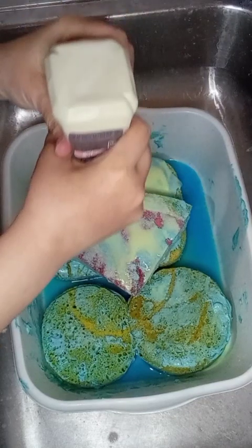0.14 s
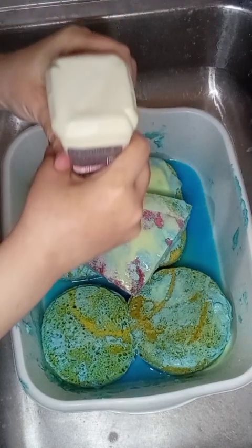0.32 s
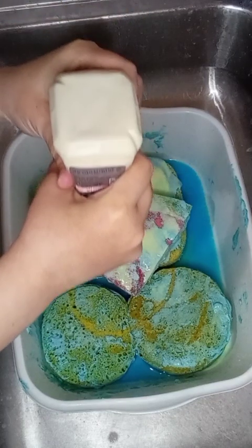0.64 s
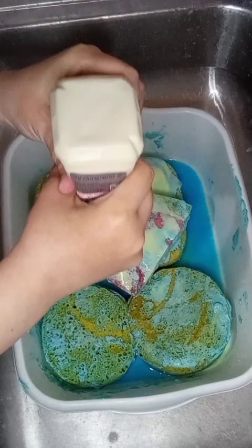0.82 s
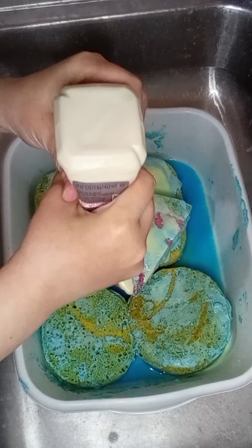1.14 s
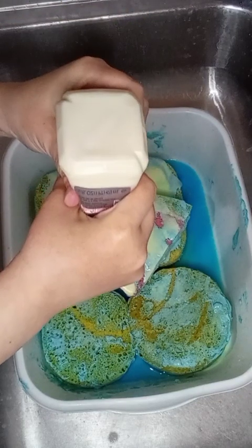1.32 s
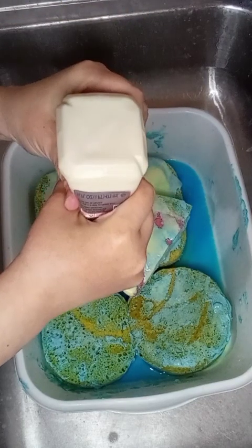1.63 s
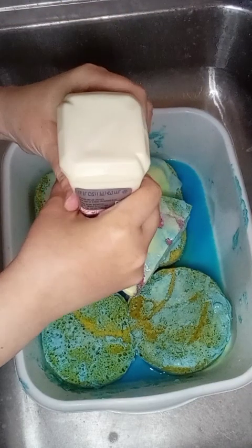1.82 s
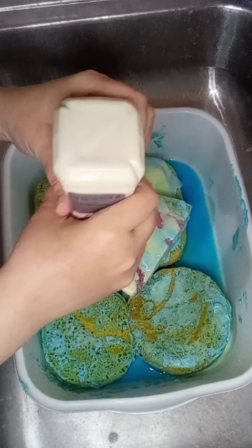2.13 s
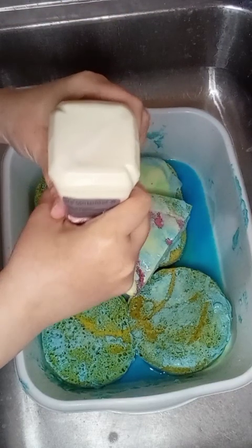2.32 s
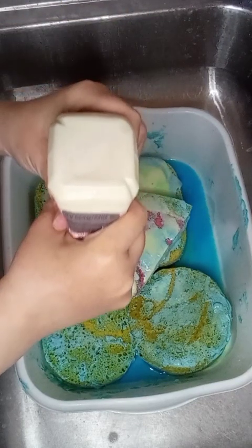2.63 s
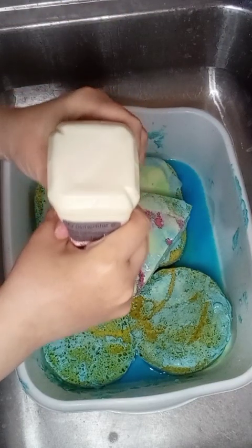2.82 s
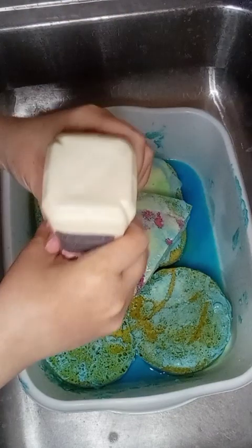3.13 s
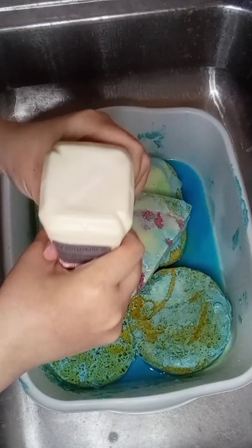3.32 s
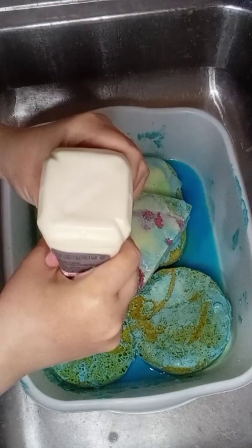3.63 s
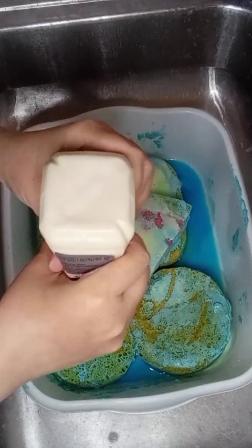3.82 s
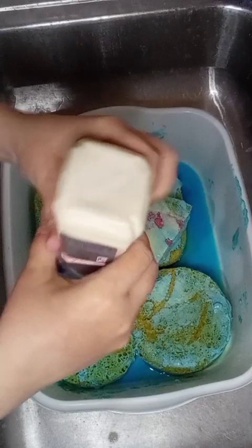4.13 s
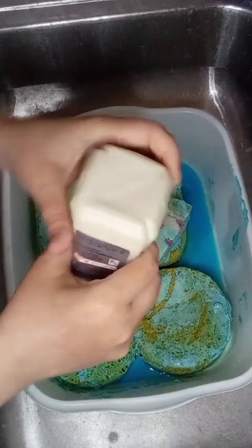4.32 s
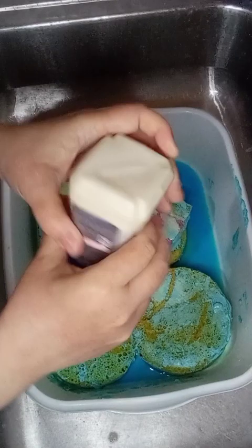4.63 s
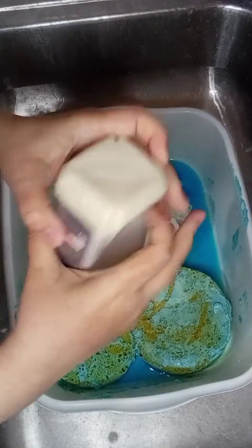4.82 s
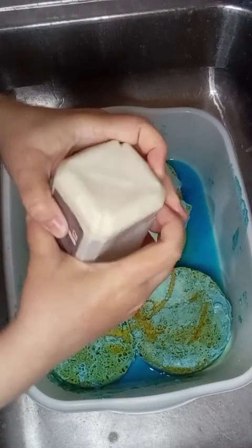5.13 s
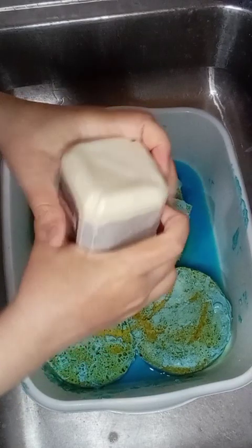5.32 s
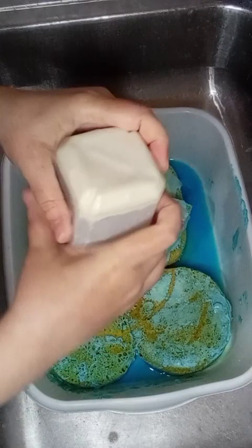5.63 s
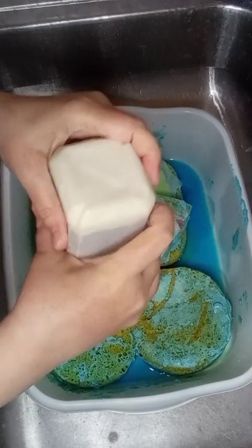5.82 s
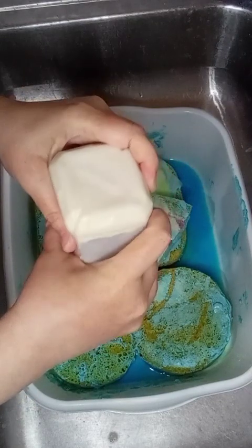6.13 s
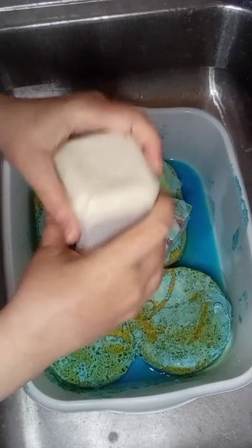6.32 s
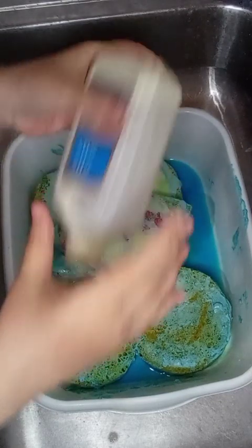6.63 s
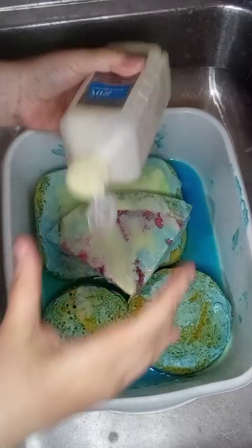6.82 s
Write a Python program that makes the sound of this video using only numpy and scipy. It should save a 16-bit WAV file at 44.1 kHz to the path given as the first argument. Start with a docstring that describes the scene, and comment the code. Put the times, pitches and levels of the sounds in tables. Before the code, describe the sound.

A close stereo take over a tub in a steel sink, with quiet stirring kitchen air, a wavering low drone, faint hum and a barely audible thin whine throughout. From the start an upended plastic bottle gives a steady, bright, breathy hiss that swells to about 1 s, then breaks into wet spurts from 1.2 s and cuts off near 1.9 s. Air gurgles back in with a low bubbling gulp. Around 2.4-2.7 s comes a shorter, rasping squirt, followed by soft gulps and a fuller gurgle at 3.0 s. Another brief squirt arrives at 3.4 s, with small bubbles after. Then it is mostly quiet, with a soft wall thump at 4.3 s and tiny ticks. From 5.1 to 5.6 s hollow plastic pops and cracks stand out, loudest near 5.5 s. A quick spluttering squirt at 5.9-6.1 s ends in little gurgles, then faint low pops at 6.6 s and room tone to about 7 s.

```python
"""Close stereo take, a bottle held upside down over soapy sponges in a tub in a steel sink.
A long squeeze hisses with air and spurting soap for 1.9 s; short squeezes follow near 2.4, 3.4 and 5.9 s.
Air gurgles back in between; dented plastic walls pop as the hands shift their grip, mostly from 5.1 to 5.6 s.
Hiss is shaped noise coloured by the sink, gurgles are knocks on a cavity, pops are snaps that ring the bottle.
Behind it all, the kitchen is stirring air, a low drone, a hum and a thin whine."""
import sys
import numpy as np
from scipy import signal
from scipy.fft import rfft, irfft
from scipy.io import wavfile
from scipy.ndimage import uniform_filter1d, map_coordinates

SR = 44100
rng = np.random.default_rng(int(sys.argv[2]) if len(sys.argv) > 2 else 0)


def master(y):
    """Save y as 16-bit WAV."""
    cut = np.clip(np.atleast_2d(y).T, -1, 1)
    pcm = np.round(cut * 32767)  # scale
    wavfile.write(sys.argv[1], SR, pcm.astype(np.int16))


N = 307812
TIME = np.arange(N) / SR
FREQS = np.fft.rfftfreq(N, 1 / SR)

# left-right likeness of flow and room air: (frequency [Hz], likeness [0-1])
LIKENESS = [(100, 0.81), (600, 0.39), (1400, 0.09), (3000, 0.05), (16000, 0.05)]


def amp(db):
    """Decibels to gain."""
    return 10 ** (np.asarray(db) / 20)


def unit(x):
    """Scales to rms 1."""
    return x / np.sqrt(np.mean(x ** 2) + 1e-20)


def read(points, hz):
    """Reads a spectrum on a log-frequency axis."""
    f, value = np.transpose(points)
    return np.interp(np.log(hz + 1), np.log(f), value)


def colour(x, gain):
    """Filters by a gain for each frequency."""
    return irfft(rfft(x) * gain, N)


def hump(f, centre, half_width, order=2):
    """Gain of a resonance, half at the half-width; a higher order has steeper sides."""
    return 1 / (1 + abs((f - centre) / half_width) ** order)


def wander(hz):
    """Smooth chance of rms 1, mostly slower than the given rate."""
    return unit(colour(rng.standard_normal(N), hump(FREQS, 0, hz)))


def pair(likeness, size=N):
    """Noise at two microphones, sharing a common part and an opposed part."""
    common, opposed = rfft(rng.standard_normal((2, size)))
    c = np.clip(likeness, 0, 1)
    middle = np.sqrt((1 + c) / 2) * common
    side = np.sqrt((1 - c) / 2) * opposed
    return irfft(middle + np.array([[1], [-1]]) * side, size)


def add(mix, s, sound):
    """Mixes a sound in at time s."""
    part = mix[..., round(s * SR):][..., :sound.shape[-1]]
    part += sound[..., :part.shape[-1]]


def nozzle(fine, coarse, wet, jet_db=4, spray_db=2.5, sputter_db=1.8, fizz_db=1.13, clots_db=1.24):
    """The jet hisses fairly evenly; spray and splutter share one sputtering flow, with soap in clots."""
    # colour of the spray: (frequency [Hz], density [dB per Hz])
    spray_colour = [(400, -37.5), (1200, -4), (1600, 0), (2000, 2.5), (2600, 1), (3500, 1.5), (4600, -4.5),
                    (7000, -11), (9000, -27.5), (11000, -27), (13800, -30.5), (14800, -14.5), (16000, -4.5)]
    # colour of the wet splutter: (frequency [Hz], density [dB per Hz])
    splutter_colour = [(100, -29), (230, -18), (400, -13), (700, 0.5), (950, 5.5), (1450, 2.5),
                       (2000, -7.5), (4000, -18.5), (16000, -47)]
    air = amp(jet_db + fizz_db * wander(370)) * fine * jet()
    spray = amp(spray_db) * coarse * spatter(spray_colour, burst_db=2.5, burst_hz=301.8)
    clots = amp(clots_db * wander(45))
    splutter = clots * wet * spatter(splutter_colour, burst_db=1.0, burst_hz=119)
    return air + (spray + splutter) * amp(sputter_db * wander(60))


def jet(flutter=0.017, patchy_db=1.78):
    """Turbulence in the nozzle: noise with a broad fluttering peak that moves in pitch, width and height."""
    # the peak climbs and sharpens to 1.15 s, then drops again, and is broader in the short squeezes:
    # (time [s], pitch [Hz], half-width [Hz], height of the peak [dB])
    peak_path = [(0, 5300, 2250, 7.5), (.45, 5400, 1930, 9.5), (.8, 6000, 1510, 9), (1.15, 7300, 1300, 4.5),
                 (1.8, 6420, 1058, 11), (2.5, 5840, 1800, 7), (3.5, 5160, 1604, 7), (6.1, 5855, 1720, 7)]
    # colour under the peak: (frequency [Hz], density [dB per Hz])
    jet_colour = [(300, -55.5), (1200, -34), (2200, -15.5), (3000, -7.5), (3800, -7.5), (4500, -3.5),
                  (7200, -2), (7900, -8), (9800, -3), (11500, -9.5), (13800, -13.5), (14800, -4),
                  (15800, -5.5)]
    f, t, z = signal.stft(rng.standard_normal(N), SR, nperseg=512)
    when, *controls = np.transpose(peak_path)
    pitch, width, height = (np.interp(t, when, control) for control in controls)
    pitch = pitch * np.exp(flutter * np.interp(t, TIME, wander(27)))
    # turbulence is uneven over neighbouring frequencies and moments
    patches = uniform_filter1d(rng.standard_normal(z.shape), size=6, axis=0)
    patches = unit(uniform_filter1d(patches, size=8, axis=1))
    peak_db = height * hump(f[:, None], pitch, width)
    shape = amp(read(jet_colour, f)[:, None] + peak_db + patchy_db * patches)
    shape /= np.linalg.norm(shape, axis=0)
    return unit(signal.istft(z * shape, SR, nperseg=512)[1][:N])


def spatter(spectrum, burst_db, burst_hz):
    """Soap films tear in quick uneven bursts."""
    bursts = rng.standard_normal(N) * amp(burst_db * wander(burst_hz))
    return unit(colour(bursts, amp(read(spectrum, FREQS))))


def outflow():
    """Gains of jet, spray and splutter: the stream of air and the spurts add in power."""
    # the long first squeeze drives a steady stream of air: (time [s], effort [dB])
    stream = [(0.0, -40.5), (0.146, -37.5), (1.02, -30), (1.382, -33.5), (1.408, -37), (1.534, -34),
              (1.618, -46.5), (1.796, -43.5), (1.88, -86)]
    # the stream is mostly jet: (jet [dB], spray [dB], splutter [dB]), relative to the effort
    stream_mix = (2.4, -10.5, -24.5)
    # spurts of soap and air, and the breath of air sucked back at 1.89 s, ahead of the nozzle's own trims:
    # (start [s], rise [s], hold [s], fade [dB per s of spray], spray [dB],
    #  jet over spray [dB], splutter over spray [dB])
    spurts = [(1.198, 0.1, 0.025, 114, -31, -26, -16), (1.353, 0.015, 0.059, 260, -33.5, -20, -9),
              (1.519, 0.017, 0.047, 95, -34.5, -23, -7.5), (1.708, 0.015, 0.07, 326, -40, -19, -13),
              (1.89, 0.061, 0.0097, 157, -53.5, -4, -1.5), (2.425, 0.051, 0.057, 136, -35, 3.5, -13),
              (2.523, 0.065, 0.11, 176, -31.5, -5, -9), (2.799, 0.081, 0.026, 299, -54, -11, 3),
              (3.051, 0.036, 0.055, 279.5, -56.5, -4, -0.5), (3.379, 0.034, 0.1, 104.5, -39, -0.5, -4),
              (3.444, 0.047, 0.042, 117, -33.5, -6, -9), (3.683, 0.026, 0.053, 338, -48.5, -11, 2.5),
              (5.913, 0.04, 0.027, 109, -42, -6.5, -3.5), (5.968, 0.032, 0.013, 163, -32.5, -2, -9),
              (6.024, 0.024, 0.032, 204, -36.5, -7, -1.5), (6.148, .02, 0.032, 130, -62, -10, 4),
              (6.242, 0.031, 0.01, 333, -55.5, -14.5, 1.5)]
    effort = np.interp(TIME, *np.transpose(stream), right=-200)
    power = amp(np.add.outer(stream_mix, effort)) ** 2
    for row in spurts:
        start, gains = spurt(*row)
        add(power, start, gains ** 2)
    return np.sqrt(power)


def spurt(start, rise, hold, fade, db, jet_db, splutter_db, open_s=.008, breakout_db=-7):
    """A spurt breaks out under its peak, builds, holds and sinks; jet, spray and splutter follow its pressure."""
    # the jet needs force, the splutter lingers:
    # (jet [dB per dB of pressure], spray [dB per dB], splutter [dB per dB])
    pressure_law = (1.8, 1.0, 0.92)
    t = np.arange(SR) / SR
    pressure = breakout_db * np.clip(1 - t / rise, 0, 1) - fade * np.maximum(t - rise - hold, 0)
    mix = db + np.array([[jet_db], [0], [splutter_db]])
    opening = np.minimum(t / open_s, 1)
    return start, opening * amp(mix + np.outer(pressure_law, pressure))


def gurgle(wet, churn_db=-17, bubbles_per_s=110, unevenness=0.29, rise_s=.025, fade_db_per_s=304):
    """An uneven train of bubbles knocks on the air inside the bottle, in gulps and softly while soap flows."""
    # air bubbles back into the bottle: (start [s], length [s], level [dB])
    gulp_times = [(1.897, 0.13, -46), (2.54, 0.028, -50.5), (2.722, 0.076, -51.5), (2.906, 0.064, -52),
                  (3.024, 0.13, -42.5), (3.58, 0.058, -48), (3.764, 0.052, -52.5), (6.095, 0.078, -56),
                  (6.274, 0.038, -49)]
    # resonances of the bubbling bottle: (frequency [Hz], full width [Hz], level [dB])
    cavity = [(131.2, 36, -1.5), (188.4, 45, 6), (235.2, 20, 6), (322, 55, -9), (538, 37, -4)]
    turns = np.cumsum(bubbles_per_s * np.exp(unevenness * wander(80))) / SR
    # one knock of random strength at each whole turn
    knocks = np.diff(np.floor(turns), prepend=0) * rng.uniform(0.17, 1, N)
    body = sum(amp(db) * hump(FREQS, hz, width / 2) for hz, width, db in cavity)
    gulps = np.zeros(N)
    for s, length, db in gulp_times:
        rise = np.clip((TIME - s) / rise_s, 0, 1)
        gulps += rise * amp(db - fade_db_per_s * np.maximum(TIME - s - length, 0))
    return (gulps + amp(churn_db) * wet) * unit(colour(knocks, body))


def pops(snap_cycles=0.49, ring_db=-8.0, room_db=-12, grip_detune=0.026):
    """A wall flips in about one swing, its crease cracks, the grip-detuned bottle rings and the room answers."""
    # the walls buckle, levels before the walls radiate: (time [s], snap level [dB], snap pitch [Hz],
    #  ringing over snap [dB, before ring_db], crack over snap [dB])
    buckles = [(3.295, -36, 154, 2.5, -40), (4.271, -32, 182, 3.5, -39.5), (5.1263, -19.5, 234, -2.5, -42),
               (5.1970, -20.5, 235, 4, -38.5), (5.2572, -31, 500, -2, -30), (5.2628, -33, 473, 7, -31),
               (5.2690, -33.5, 570, 0.5, -30), (5.2755, -19.5, 238, -3, -34),
               (5.4853, -25, 540, -4.5, -37.5), (5.4888, -13.5, 271, -6.5, -40),
               (5.4925, -29, 448, -12, -43), (5.5160, -32, 584, 1.5, -44), (5.5194, -21.5, 166, -1, -44),
               (5.5928, -16, 720, 0, -14), (5.5991, -19, 525, -10, -40), (6.602, -37.5, 115, -1, -40),
               (6.6110, -37, 123, 2, -39.5)]
    # what the bottle rings with: (frequency before detuning [Hz], level [dB], t60 [s])
    bottle_modes = [(108.8, -1, 0.2), (195.5, -4.5, 0.084), (231.8, -10.5, 0.21), (357, -12.5, 0.1),
                    (521, -0.5, 0.09), (580, -4, 0.24), (634, -8.5, 0.24), (746, -11, 0.17),
                    (980, -11, 0.04), (1290, -16, .04), (2320, -9, .04), (2770, -1, .03)]
    # crack of a crease: (frequency [Hz], half-width [octaves], t60 [s])
    crease = (1980, 0.47, 0.025)
    # how well the flexing walls radiate: (frequency [Hz], gain [dB])
    radiation = [(20, -25.5), (50, -6), (100, 0.5), (220, 0), (310, -8.5), (440, 3), (900, 0.5),
                 (3000, -4.5), (6000, -19)]
    lead = .012  # s from the start of the snap's window to its centre
    t = np.arange(SR // 2) / SR
    octaves = np.log2(np.fft.rfftfreq(len(t), 1 / SR) + 1)
    crack_hz, crack_width, crack_t60 = crease
    out = np.zeros(N)
    for s, db, hz, ringing_db, crack_db in buckles:
        tension = 1 + grip_detune * rng.uniform(-0.94, 1)
        ring = sum(amp(level - 60 * t / t60) * np.cos(2 * np.pi * mode * tension * t)
                   for mode, level, t60 in bottle_modes)
        turns = (t - lead) * hz
        snap = -np.sin(2 * np.pi * turns) * np.exp(-(turns / snap_cycles) ** 2)
        rung = signal.fftconvolve(snap, ring)[:len(t)] / abs(snap).sum()
        add(out, s - lead, amp(db) * (snap + amp(ring_db + ringing_db) * rung))
        crack_band = hump(octaves, np.log2(crack_hz), crack_width, order=6)
        crack = irfft(rfft(rng.standard_normal(len(t))) * crack_band, len(t))
        add(out, s, crack / abs(crack).max() * amp(db + crack_db - 60 * t / crack_t60))
    out = colour(out, amp(read(radiation, FREQS)))
    return out + amp(room_db) * echoes(out, t60=0.22, delay=0.018)


def echoes(x, t60, delay):
    """Dense dying reflections of energy 1, different at each microphone."""
    t = np.arange(SR // 2) / SR
    tail = rng.standard_normal((2, len(t))) * amp(-60 * t / t60) * (t > delay)
    tail /= np.linalg.norm(tail, axis=1, keepdims=True)
    return signal.fftconvolve(np.atleast_2d(x), tail, axes=1)[:, :N]


def ticks(grain_db=-3.5):
    """Small smacks and crackles, each a quickly dying grainy fizz."""
    # wet smacks and blubs at the nozzle and crackles of the plastic, levels ahead of the sink:
    # (time [s], level [dB], frequency [Hz], half-width [octaves], t60 [s])
    smacks = [(1.875, -65, 2400, 1.3, 0.091), (1.952, -43.5, 4970, 0.57, 0.031),
              (2.845, -43.5, 620, 0.34, .35), (2.885, -45, 710, 0.71, 0.13), (3.022, -64, 10000, .25, .09),
              (3.073, -55, 9800, 0.12, 0.057), (3.19, -69, 10000, .3, 0.045),
              (3.857, -58.5, 6900, 1.8, 0.066), (3.925, -70, 10100, 0.18, 0.042),
              (4.273, -60, 2980, 0.68, 0.066), (4.531, -43, 5140, 0.24, 0.057),
              (5.121, -62.5, 8000, 1.9, 0.05), (5.195, -49.5, 1370, 1.87, 0.36),
              (5.203, -61.5, 4600, 0.32, 0.62), (5.255, -43, 900, 0.91, 0.14),
              (5.272, -47, 3650, 1.4, 0.083), (5.492, -59.5, 4740, 1, 0.2), (5.59, -44.5, 940, 0.86, 0.17),
              (5.825, -64, 4400, 0.11, 0.31), (5.922, -42.5, 5500, 1, 0.054),
              (5.941, -38.5, 620, 0.47, 0.17), (6.37, -71, 9980, .3, .06), (6.51, -66, 8850, 1.6, 0.041)]
    t = np.arange(SR // 4) / SR
    octaves = np.log2(np.fft.rfftfreq(len(t), 1 / SR) + 1)
    out = np.zeros(N)
    for s, db, hz, width, t60 in smacks:
        band = hump(octaves, np.log2(hz), width, order=4)
        fizz = irfft(rfft(rng.standard_normal(len(t))) * band, len(t))
        add(out, s, unit(fizz) * amp(db - 60 * t / t60))
    return out * unit(amp(grain_db * wander(200)))


def bounce(x):
    """The echo off the tub combs the hiss with ridges and hollows that slide as the bottle moves."""
    # early echo off the tub: (time [s], delay [ms], strength relative to the direct sound [0-1])
    tub_echo = [(0, .725, .22), (.4, .752, .32), (.8, .775, .22), (1.2, .74, .08), (1.8, .72, .08),
                (2.6, .76, .08), (3.5, .83, .12), (6.1, .83, .1)]
    when, *controls = np.transpose(tub_echo)
    delay_ms, strength = (np.interp(TIME, when, control) for control in controls)
    echo = map_coordinates(x, [(TIME - delay_ms / 1000) * SR], order=3)
    return (x + strength * echo) / np.hypot(1, strength)


def sink(x, steel_width_hz=34, gain_db=-1, standing=0.83, size=16384):
    """Standing waves and ringing steel colour the hiss differently at each microphone."""
    # standing waves between the steel walls, before the standing factor:
    # (frequency [Hz], full width [Hz], left [dB], right [dB])
    wall_waves = [(797, 80, -2.0, -3.9), (904, 80, 2.8, 5.2), (1087, 80, 4.9, -0.1), (1238, 80, -3.7, -4.5),
                  (1335, 80, -1.5, 2.6), (1400, 80, 2.9, -2.7), (1464, 200, 2.2, 2.2),
                  (1550, 130, -1.7, 2.1), (1733, 130, 1.3, -4.4), (2003, 130, -4.5, 0.3),
                  (2143, 80, -0.4, 3.9), (2304, 80, -2.1, -2.4), (2433, 80, 2.7, -2.0),
                  (2692, 130, 3.6, -2.2), (2875, 80, -3.0, -4.0), (3262, 200, 1.5, 0.5),
                  (3564, 200, 1.4, -2.4), (3865, 130, -2.7, 5.0), (4285, 200, -3.4, -4.5),
                  (4619, 200, 0.2, 2.7), (5093, 130, 0.4, -3.6), (5965, 320, 0.5, 0.5),
                  (6320, 80, 1.0, -4.3), (6675, 80, 1.0, 2.0), (7041, 80, -4.1, 1.9),
                  (7483, 130, 4.8, -2.0), (7860, 320, -3.1, 1.2), (8742, 130, 2.9, 2.8)]
    # sharp ringing of the steel basin, before the standing factor: (frequency [Hz], left [dB], right [dB])
    basin = [(754, 3.2, -3.1), (883, 3.2, 1.6), (991, -0.8, 3.1), (1184, -0.7, 2.7), (1281, 2.8, -2.2),
             (1432, 1.3, 1.7), (1561, 2.2, 3.4), (1938, 0.5, 4.4), (2110, -0.9, 1.0), (3025, -1.1, 3.0),
             (3822, 1.0, 2.3), (4027, 0.1, 4.0), (4963, 1.5, 3.5), (5039, 3.8, -1.3), (5254, 1.2, 3.6),
             (5297, -1.7, 3.7), (5502, -1.0, -2.2), (5609, -2.8, 3.1), (5868, 1.3, 2.6), (6169, 1.0, 0.4),
             (6212, 4.7, -0.2), (6449, -0.2, 3.5), (6492, 2.5, 4.1), (6675, 0.3, -0.2), (6955, -0.7, 0.9),
             (7138, 0.8, -3.0), (7321, 2.3, 3.6), (7397, 4.3, 1.4), (7504, 1.3, -1.4), (8786, 3.2, -1.3)]
    # the right microphone is shaded from the highest hiss: (frequency [Hz], left minus right [dB])
    shade = [(700, -1), (3000, 0.5), (4500, -2.5), (7000, 2), (8600, 11), (10500, 14), (13300, 6.5),
             (14300, 3.5), (16000, 4.5)]
    modes = list(wall_waves) + [(hz, steel_width_hz, left, right) for hz, left, right in basin]
    f = np.fft.rfftfreq(size, 1 / SR)
    waves_db = sum(np.array([[left], [right]]) * .5 ** ((2 * (f - hz) / width) ** 2)
                   for hz, width, left, right in modes)
    sides = amp(np.array([[.5], [-.5]]) * read(shade, f))
    sides /= np.sqrt(np.mean(sides ** 2, axis=0))
    gain = amp(standing * waves_db + gain_db) * sides
    return drifting(x, causal(gain), size)


def drifting(x, gain, size, count=15):
    """Filters by a gain and by reflections that fade from one pattern to the next as the bottle moves."""
    out = np.zeros((2, N))
    place = np.linspace(0, count - 1, N)
    for k in range(count):
        near = np.flatnonzero(abs(place - k) < 1)
        part = x[near] * np.cos(np.pi / 2 * (place[near] - k))  # equal-power crossfade
        response = irfft(paths(np.fft.rfftfreq(size, 1 / SR), size) * gain, size)
        add(out, near[0] / SR, signal.fftconvolve(part[None], response, axes=1))
    return out


def paths(f, size, near_t60=0.06, far_t60=.17, far_db=-13, count=110):
    """Frequency response of the scatter of reflections on the way to each microphone."""
    t = np.arange(size) / SR
    decay = amp(-60 * t / near_t60) + amp(far_db - 60 * t / far_t60)
    scatter = pair(read(LIKENESS, f), size=size) * decay
    response = rfft(scatter / np.linalg.norm(scatter, axis=1, keepdims=True))
    # soften the nulls and even out the broad colour of the random draw, leaving a fine ripple
    response *= causal((abs(response) ** 2 + .05) ** -.27)
    broad_power = uniform_filter1d(abs(response) ** 2, size=count, axis=1)
    return response * causal(broad_power ** -.5)


def causal(gain):
    """Gives a gain the phase of a real resonator, which rings only after it is struck."""
    log_gain = np.log(np.concatenate([gain, gain[:, -2:0:-1]], axis=1))
    return np.exp(np.conj(signal.hilbert(log_gain)))[:, :gain.shape[1]]


def kitchen(air_db=-61.8, drone_db=-4.0, drone_hz=570, drone_width_hz=58, stir_db=0.6, waver_db=5.0,
            hum_waver_db=4.0, under_hz=450, under_width_hz=50, under_db=-11):
    """Stirring air, a two-band noise drone that swells and fades, and a faint wavering hum and whine."""
    # colour of the room air: (frequency [Hz], density [dB per Hz])
    air_colour = [(15, -65.5), (25, -56.5), (49, -11.5), (82, -14), (108, -6.5), (217, -8.5), (384, -13),
                  (575, -9.5), (695, -13.5), (1330, -21), (2280, -24), (3520, -28.5), (6380, -31.5),
                  (8830, -43), (16000, -48)]
    # swells of the drone, before drone_db and the waver: (time [s], level [dB])
    drone_path = [(0, -52), (.6, -62), (1.3, -57), (2.3, -58.5), (2.37, -57), (2.9, -49), (3.3, -60.5),
                  (3.75, -50), (4.1, -69), (4.85, -62.5), (5.45, -62), (5.7, -56.5), (6.5, -60),
                  (6.75, -58.5)]
    # the mains hum: (frequency [Hz], level before the waver [dB])
    mains_hum = (118.4, -77)
    # a thin whine: (frequency [Hz], level before the waver [dB])
    thin_whine = (5233, -87.5)
    air = unit(colour(pair(read(LIKENESS, FREQS)), amp(read(air_colour, FREQS))))
    air *= amp(air_db + stir_db * wander(18))
    upper = hump(FREQS, drone_hz, drone_width_hz, order=3)
    under = amp(under_db) * hump(FREQS, under_hz, under_width_hz, order=3)
    drone = unit(colour(pair(0.68), upper + under))
    drone *= amp(drone_db + np.interp(TIME, *np.transpose(drone_path)) + waver_db * wander(4.5))
    hum = np.zeros(N)
    for hz, db in (mains_hum, thin_whine):
        level = amp(db + hum_waver_db * wander(8))
        cycles = hz * np.cumsum(1 + 0.005 * wander(93.3) + 0.0013 * wander(6)) / SR
        hum += level * unit(np.sin(2 * np.pi * cycles))
    return air + drone + hum


def hollow(db=-81, hz=2100, width_hz=260, waver_db=4):
    """A faint hollow band of noise in the background that comes and goes."""
    band = unit(colour(pair(.1), hump(FREQS, hz, width_hz, order=4)))
    return amp(db + waver_db * wander(7)) * band


def scene():
    """The bottle is a little to the right, above the tub."""
    fine, coarse, wet = outflow()
    hiss = sink(bounce(nozzle(fine, coarse, wet)) + ticks())
    bottle = (pops() + gurgle(wet)) * amp([[-.9], [.9]])  # left and right [dB]
    return hiss + bottle + kitchen() + hollow()


def record(dry, edge_hz=15850):
    """The recorder's band limit: a steep low-pass at both microphones."""
    low_pass = signal.firwin(511, edge_hz, window=("kaiser", 9), fs=SR)
    return signal.oaconvolve(dry, low_pass[None], "same")


dry = scene()
out = record(dry)
master(out)
```